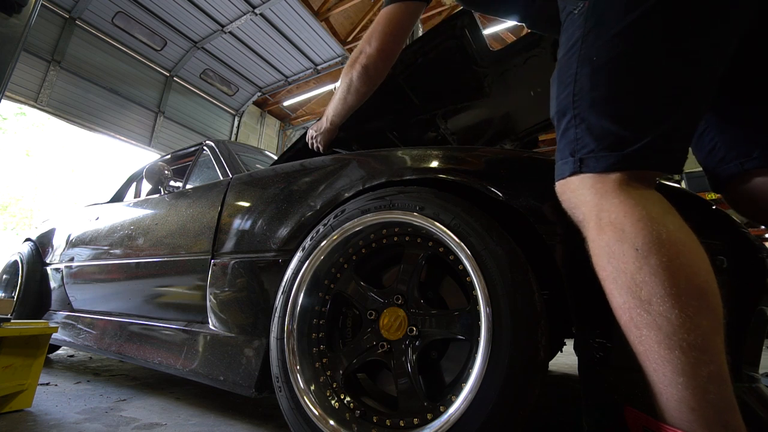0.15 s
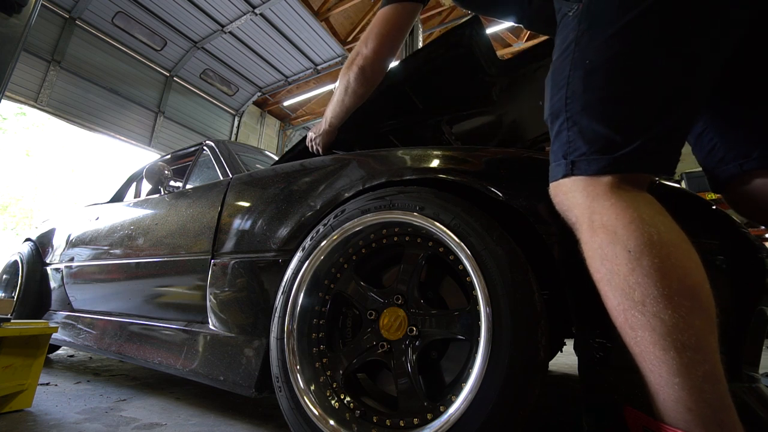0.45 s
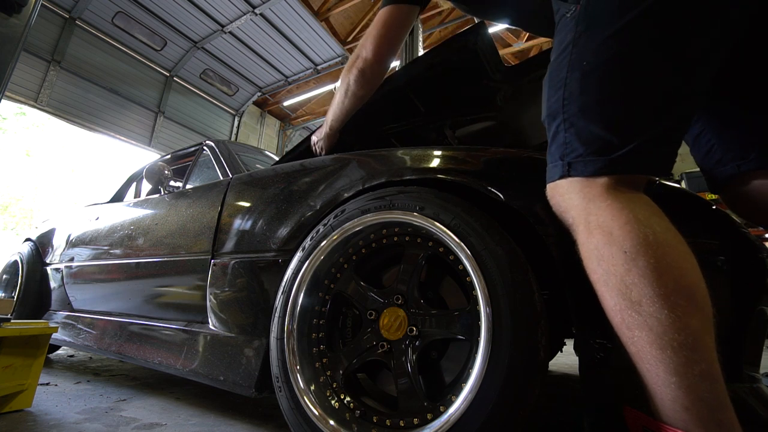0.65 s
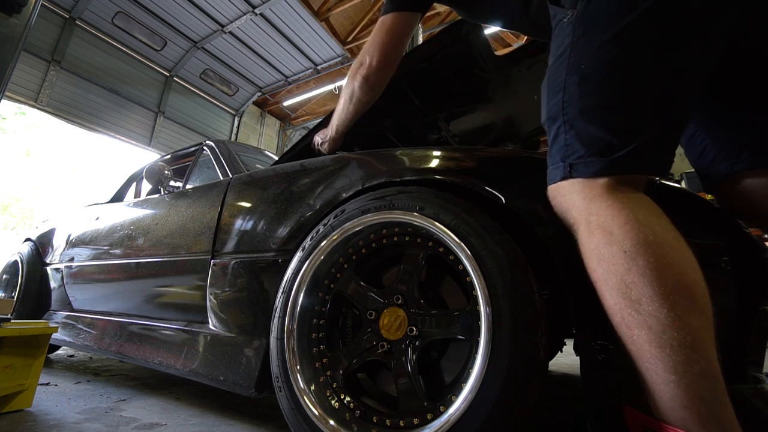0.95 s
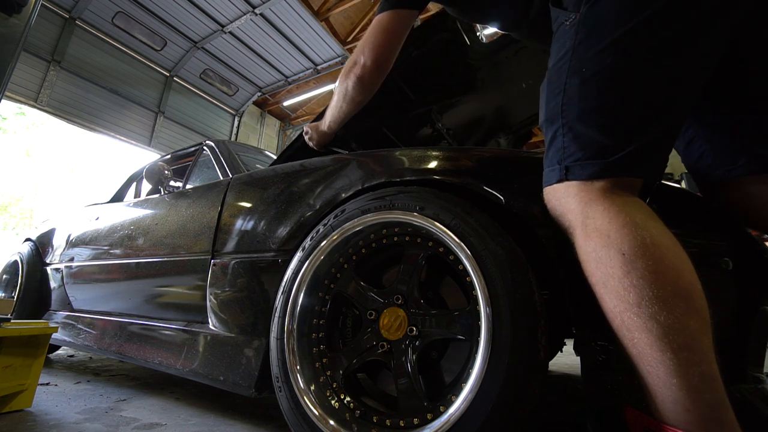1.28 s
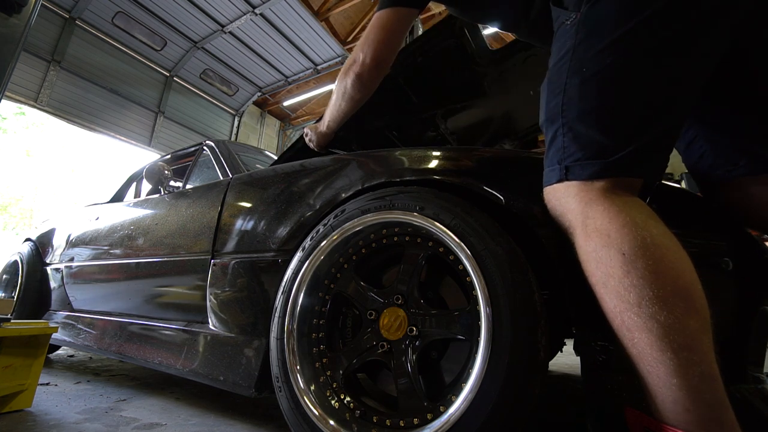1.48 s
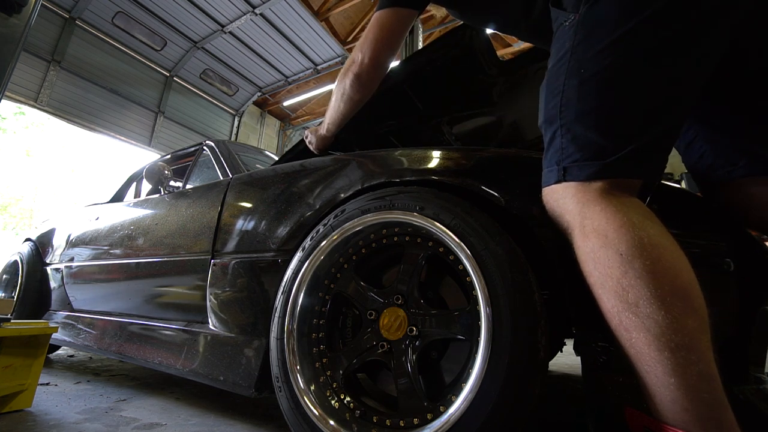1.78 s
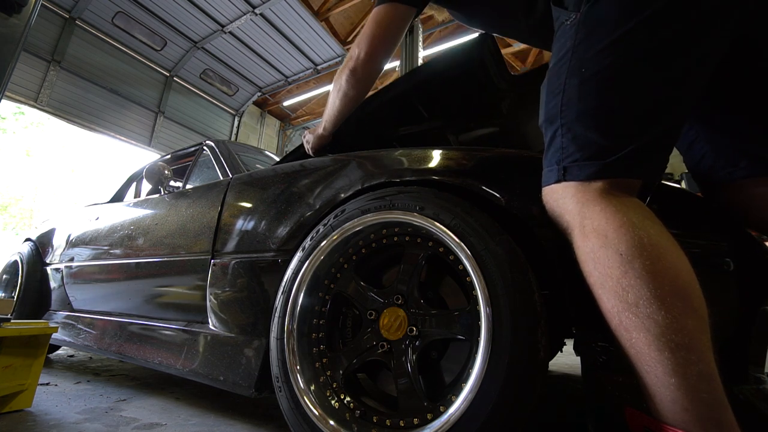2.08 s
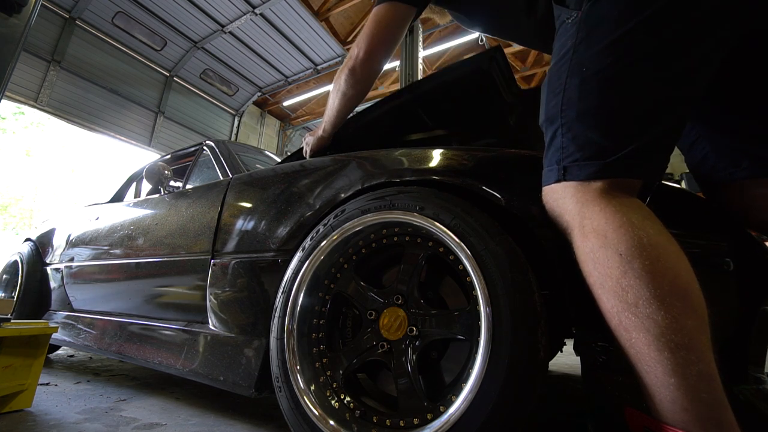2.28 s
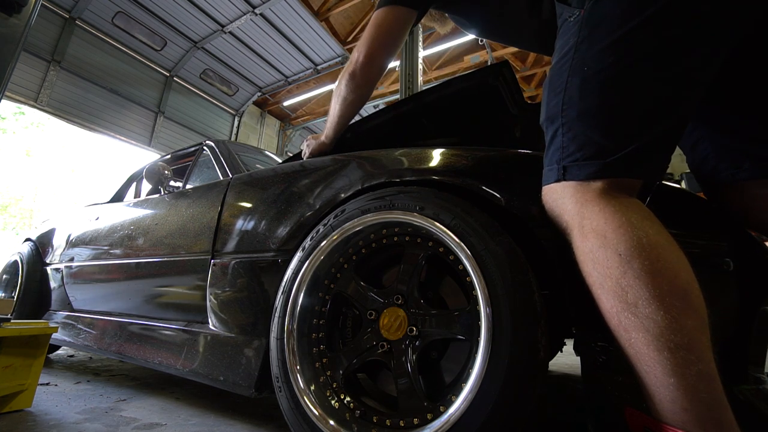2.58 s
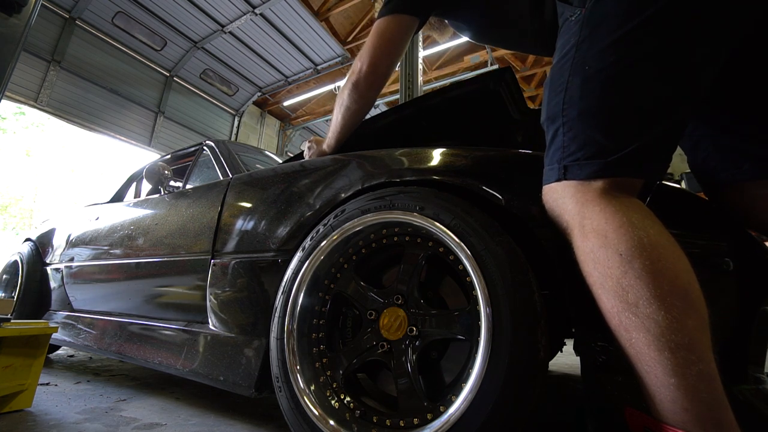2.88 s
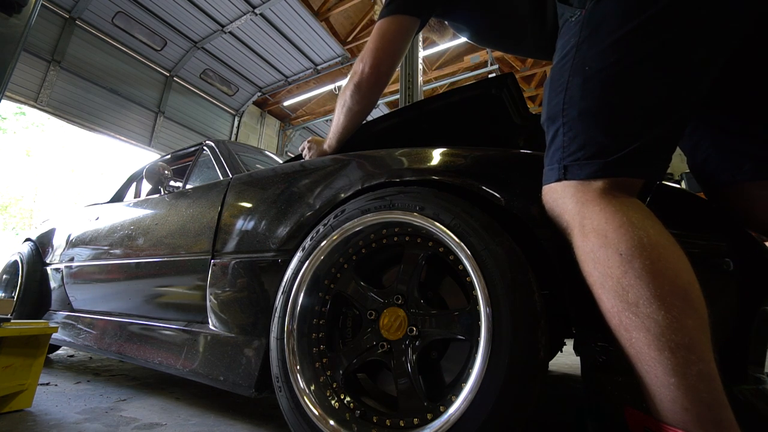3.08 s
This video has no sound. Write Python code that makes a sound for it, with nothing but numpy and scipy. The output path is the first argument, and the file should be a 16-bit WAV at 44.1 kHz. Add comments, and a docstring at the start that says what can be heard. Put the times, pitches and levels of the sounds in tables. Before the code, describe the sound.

An air nozzle gives five short hissing blasts at a regular pace over a steady machinery hum. Close by, a car hood rumbles softly as it is shifted and clunks once, just before the second blast, in a reverberant workshop.

```python
"""Machinery hums throughout in a reverberant workshop. From the start come short hissing rushes, most
likely an air nozzle, about every 0.6 s; the valve squeaks faintly before most of them. Close by, a car
hood is shifted by hand: its panel rumbles softly, and at 0.6 s it clunks once. A faint sizzle lingers
from 0.9 to 1.4 s. The hood settles by about 2 s and the last blast closes at 2.8 s.
An automatic gain control ducks under each rush."""
import sys
import numpy as np
from scipy import signal
from scipy.fft import rfft, irfft, next_fast_len
from scipy.io import wavfile
from scipy.ndimage import uniform_filter1d, map_coordinates

SR = 44100
rng = np.random.default_rng(int(sys.argv[2]) if len(sys.argv) > 2 else 0)


def to_wav(s):
    """Save 16-bit WAV."""
    ch = np.atleast_2d(s).T  # columns
    pcm = np.round(np.clip(ch, -1, 1) * 32767)  # PCM
    wavfile.write(sys.argv[1], SR, pcm.astype(np.int16))


N = 143325
LEAD = SR // 2  # samples before time zero, so the room already rings
M = N + LEAD
T = (np.arange(M) - LEAD) / SR


def amp(db):
    """Decibels to gain."""
    return 10 ** (np.asarray(db) / 20)


def unit(x):
    """Scale to rms 1."""
    return x / np.sqrt(np.mean(x ** 2) + 1e-20)


def along(points, hz):
    """Interpolate (Hz, value) points on a log frequency axis."""
    point_hz, values = np.transpose(points)
    return np.interp(np.log(hz + 1), np.log(point_hz + 1), values)


def wobble(knots_per_s):
    """Smooth random curve."""
    knots = rng.standard_normal(int(M * knots_per_s / SR) + 4)
    return map_coordinates(knots, [np.arange(M) * knots_per_s / SR])


def filtered(x, response):
    """Filter x by response(hz)."""
    n = x.shape[-1]
    size = next_fast_len(n + 8192)
    return irfft(rfft(x, size) * response(np.fft.rfftfreq(size, 1 / SR)), size)[..., :n]


def noise(spectrum):
    """Coloured noise of rms 1."""
    return unit(filtered(rng.standard_normal(M), lambda hz: amp(along(spectrum, hz))))


def stereo(pair, likeness):
    """Mix two unrelated signals to left and right with the given correlation."""
    angle = lambda hz: np.arccos(np.clip(along(likeness, hz), -1, 1)) / 2
    mid, side = filtered(pair, lambda hz: np.array([np.cos(angle(hz)), np.sin(angle(hz))]))
    return np.array([mid + side, mid - side])


def strike(start_s, rise_s, t60_s):
    """Envelope: linear rise, exponential decay."""
    return np.clip((T - start_s) / rise_s, 0, 1) * amp(-60 * np.maximum(T - start_s - rise_s, 0) / t60_s)


# Reverberation time. Each row: frequency in Hz, T60 in seconds.
ROOM_T60_S = [(100, .5), (1000, .65), (2500, .65), (4500, .57), (8000, .41), (14000, .29)]
# Tail width. Each row: frequency in Hz, left-right correlation.
ROOM_LIKENESS = [(120, 1), (250, .99), (500, .94), (1000, .79), (2000, .55), (4500, .13), (12000, .15)]

def room(x, predelay_s=.018):
    """Stereo reverberation of the workshop; the treble dies first."""
    hz, t, spectra = signal.stft(rng.standard_normal((2, SR)), SR, nperseg=256)
    fade = amp(-60 * t / along(ROOM_T60_S, hz)[:, None])
    _, tail = signal.istft(spectra * fade, SR, nperseg=256)
    tail = stereo(unit(tail), ROOM_LIKENESS) / np.sqrt(tail.shape[1])
    tail = np.pad(tail, ((0, 0), (int(predelay_s * SR), 0)))
    return signal.fftconvolve(x[None], tail, axes=1)[:, :M]


# Hum lines. Each row: frequency in Hz, rms level in dB.
HUM_LINES = [(93.5, -38), (119.7, -41.5), (141, -43.5), (192, -50), (237, -49), (675, -51)]
# Fan noise. Each row: frequency in Hz, relative density in dB.
FAN_SPECTRUM = [(20, -34), (45, -8), (68, -10), (80, -9), (100, -2), (170, -7), (260, -4), (350, -8),
                (650, -7.5), (900, -16.5), (2000, -24.5), (4000, -33), (8000, -43.5), (15000, -51.5)]
# Fan width. Each row: frequency in Hz, left-right correlation.
FAN_LIKENESS = [(120, 1), (250, .99), (500, .94), (1000, .75), (3000, .4), (12000, .2)]

def machinery(hum_waver_db=2, drift_rad=.6, fan_db=-34.4, fan_waver_db=.6):
    """Slightly unsteady hum lines over the rush of a fan."""
    hum = np.zeros(M)
    for hz, db in HUM_LINES:
        peak = np.sqrt(2) * amp(db + hum_waver_db * wobble(6))
        hum += peak * np.sin(2 * np.pi * hz * T + drift_rad * wobble(5))
    fan_gain = amp(fan_db + fan_waver_db * wobble(8))
    fan = stereo(np.array([noise(FAN_SPECTRUM), noise(FAN_SPECTRUM)]), FAN_LIKENESS)
    return hum + fan_gain * fan


# Sizzle noise. Each row: frequency in Hz, relative density in dB.
SIZZLE_SPECTRUM = [(3000, -18), (8000, -4), (14000, 0), (16000, -5)]

def sizzle(start_s=.91, end_s=1.4, level_db=-59):
    """A faint high hiss lingers between two blasts."""
    gate = uniform_filter1d(1.0 * ((T > start_s) & (T < end_s)), SR // 20)
    return amp(level_db) * gate * np.array([noise(SIZZLE_SPECTRUM), noise(SIZZLE_SPECTRUM)])


# Hood contacts. Each row: start in seconds, level in dB, tilt in dB per octave.
HOOD_KNOCKS = [(.576, -23, 0), (.5795, -21, 0), (.5885, -17.5, 4), (.5915, -12.5, -.5), (.599, -16, -4),
               (.612, -21, -4), (.632, -25, -3)]
# Hood modes. Each row: frequency in Hz, relative level in dB, T60 in seconds.
HOOD_MODES = [(340, -15, .1), (716, -7, .06), (930, -3, .07), (1290, -1, .1), (1560, 3, .055),
              (1733, -5, .06), (2099, -7, .07), (2546, -13, .09), (3560, -12, .07), (4010, -11, .08),
              (4334, -13, .08), (5080, -14, .06)]
# Contact noise. Each row: frequency in Hz, relative density in dB.
CRACK_SPECTRUM = [(100, -3), (400, -2), (750, 0), (1100, -3), (1700, 2), (2800, -6), (4600, -5),
                  (6500, -17), (15000, -25)]

def hood_clunk(ring_db=-4, ring_rise_s=.0007, crack_db=-1):
    """The hood clatters against the body; each contact cracks and rings its modes."""
    clunk = np.zeros(M)
    t = np.arange(SR // 3) / SR
    for start_s, db, tilt in HOOD_KNOCKS:
        ring = np.zeros(len(t))
        for hz, mode_db, t60_s in HOOD_MODES:
            struck_db = mode_db + tilt * np.log2(hz / 1500) + rng.normal(0, 1.5)
            ring += amp(struck_db - 60 * t / t60_s) * np.sin(2 * np.pi * (hz * t + rng.random()))
        ring *= 1 - np.exp(-t / ring_rise_s)
        clunk[LEAD + round(start_s * SR):][:len(t)] += amp(db + ring_db) * ring
        clunk += amp(db + crack_db + tilt) * strike(start_s, .001, t60_s=.05) * noise(CRACK_SPECTRUM)
    return clunk


# Panel flexes. Each row: start, rise and T60 in seconds, level in dB.
PANEL_FLEXES = [(.02, .03, .5, -31.5), (.11, .03, .4, -29), (.43, .02, .3, -29.5), (.605, .02, .3, -22),
                (1.15, .01, .3, -28.5), (1.215, .05, .45, -29), (1.35, .02, .25, -30),
                (1.97, .06, .4, -33.5)]
# Edge ticks. Each row: start in seconds, level in dB.
EDGE_TICKS = [(.038, -37), (1.679, -44), (1.824, -55)]
# Panel and tick noise. Each row: frequency in Hz, relative density in dB.
PANEL_SPECTRUM = [(25, -22), (50, -9), (70, -9), (105, 1), (170, -5), (270, -6), (400, -11), (700, -14),
                  (1500, -24), (5000, -45), (15000, -60)]
TICK_SPECTRUM = [(1000, -12), (5000, 0), (15000, -4)]

def hood(thump_s=.606, thump_hz=56, thump_db=-26, room_db=-9):
    """The shifted hood clunks and thumps; its panel flexes and its edge ticks."""
    flexes = sum(amp(db) * strike(start_s, rise_s, t60_s) for start_s, rise_s, t60_s, db in PANEL_FLEXES)
    ticks = sum(amp(db) * strike(start_s, .001, t60_s=.025) for start_s, db in EDGE_TICKS)
    direct = hood_clunk() + flexes * noise(PANEL_SPECTRUM) + ticks * noise(TICK_SPECTRUM)
    thump = strike(thump_s, .03, t60_s=.35) * np.sin(2 * np.pi * thump_hz * (T - thump_s))
    return direct + amp(thump_db) * thump + amp(room_db) * room(direct)


# Valve squeaks. Each row: centre in seconds, level in dB.
VALVE_SQUEAKS = [(.122, -58), (1.328, -57), (2.008, -60), (2.634, -56)]

def valve_squeaks(pitch_hz=7880, width_hz=160, width_s=.011):
    """A thin whistle as the valve starts to move."""
    band = lambda hz: np.exp(-((hz - pitch_hz) / width_hz) ** 2)
    whistle = unit(filtered(rng.standard_normal(M), band))
    return whistle * sum(amp(db) * np.exp(-((T - at_s) / width_s) ** 2) for at_s, db in VALVE_SQUEAKS)


# Jet noise. Each row: frequency in Hz, relative density in dB.
JET_SPECTRUM = [(100, -33), (400, -17), (630, -11.5), (830, -14), (1050, -6.5), (1500, -3.2), (2100, -.5),
                (2800, 0), (4900, 1.2), (7000, -2.6), (11000, -5.4), (13500, -9.8), (15500, -13)]
# Nozzle and cavity resonances. Each row: frequency in Hz, width in Hz, gain in dB.
NOZZLE_MODES = [(954, 20, 1), (1045, 22, 0), (1125, 28, 7), (1205, 30, 8.5), (1500, 22, 3), (1664, 20, 5),
                (1836, 30, 6), (1936, 30, 4.5), (2130, 70, 3), (2370, 50, 4.5), (2630, 45, 1),
                (3350, 150, -1), (4750, 260, -1.5), (5860, 90, -2), (6700, 90, -2)]

def jet_hiss(tilt_db_per_octave, ring_db):
    """Two channels of jet noise, ringing the nozzle and the cavity it blows on."""
    def colour(hz):
        rush = amp(along(JET_SPECTRUM, hz) + tilt_db_per_octave * np.log2((hz + 1) / 3000))
        ring = sum(amp(db) * 1j * hz * width_hz / (mode_hz ** 2 - hz ** 2 + 1j * hz * width_hz)
                   for mode_hz, width_hz, db in NOZZLE_MODES)
        return np.hypot(rush, amp(ring_db) * abs(ring))
    return unit(filtered(rng.standard_normal((2, M)), colour))


# Air blasts. Each row: times in seconds when the valve cracks, is fully open and starts to close,
# level in dB, relative leak in dB, opening exponent (higher snaps later), tilt in dB per octave,
# nozzle ring in dB.
AIR_BLASTS = [(-.36, -.35, -.235, -11, -14, 1.5, -.2, -5), (.133, .149, .255, -10.8, -15, 1.5, -.1, -4.5),
              (.649, .670, .778, -12, -16, 1.5, .2, -7.5), (1.335, 1.388, 1.505, -12.7, -14, 4, -1.15, -.5),
              (2.017, 2.074, 2.168, -11, -18, .8, -.2, -.5),
              (2.652, 2.671, 2.782, -12.9, -19, 1.5, .3, -1.5)]
# Direct jet width. Each row: frequency in Hz, left-right correlation.
JET_LIKENESS = [(200, .99), (1500, .9), (5000, .55), (14000, .6)]
ONSET_S, CLOSE_DB_PER_S, FLUTTER_DB = .013, 215, .7
TREBLE_HZ, TREBLE_SAG_DB_PER_S = 7500, 45

def air_blasts(direct_db=-3.5, room_db=-1):
    """The valve leaks, opens, holds and closes; the hiss dulls as the pressure falls."""
    jet = np.zeros((2, M))
    for crack_s, open_s, close_s, db, leak_db, exponent, tilt, ring_db in AIR_BLASTS:
        age_s = np.maximum(T - crack_s, 0)
        opening = np.clip(age_s / (open_s - crack_s), 0, 1) ** exponent
        flow_db = leak_db * (1 - opening) - CLOSE_DB_PER_S * np.maximum(T - close_s, 0)
        hiss = jet_hiss(tilt, ring_db)
        body = filtered(hiss, lambda hz: 1 / (1 + (hz / TREBLE_HZ) ** 4))
        treble = (hiss - body) * amp(-TREBLE_SAG_DB_PER_S * age_s)
        onset = np.minimum(age_s / ONSET_S, 1)
        jet += onset * amp(db + flow_db + FLUTTER_DB * wobble(45)) * (body + treble)
    reverb = (room(jet[0]) + room(jet[1])) / np.sqrt(2)
    return amp(direct_db) * stereo(jet, JET_LIKENESS) + amp(room_db) * reverb


# Air balance. Each row: frequency in Hz, left minus right in dB.
AIR_BALANCE_DB = [(1000, -.4), (2000, .1), (4500, 2.0), (9000, 1.7), (14000, 1)]

def scene():
    """All sources, the air a little to the left."""
    balance = lambda hz: amp(np.outer([.5, -.5], along(AIR_BALANCE_DB, hz)))
    air = filtered(air_blasts() + valve_squeaks(), balance)
    return (air + hood() + machinery() + sizzle())[:, LEAD:]


AGC_THRESHOLD_DB, AGC_SLOPE, AGC_SENSE_S, AGC_RELEASE_DB_PER_S = -18, .65, .008, 18
TOP_HZ = 15850

def record(dry):
    """Gain control that ducks fast and recovers slowly, then a band limit."""
    power = abs(uniform_filter1d(np.mean(dry ** 2, axis=0), int(AGC_SENSE_S * SR)))
    over_db = np.maximum(10 * np.log10(power + 1e-12) - AGC_THRESHOLD_DB, 0)
    recovery_db = AGC_RELEASE_DB_PER_S * np.arange(N) / SR
    held_db = np.maximum.accumulate(AGC_SLOPE * over_db + recovery_db) - recovery_db
    duck_db = uniform_filter1d(held_db, size=128)
    return filtered(dry * amp(-duck_db), lambda hz: hz < TOP_HZ)


dry = scene()
out = record(dry)
to_wav(out)
```